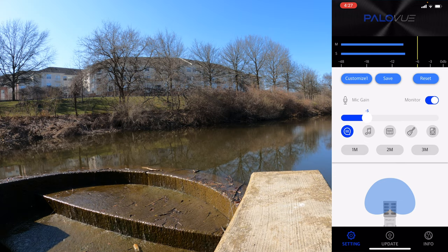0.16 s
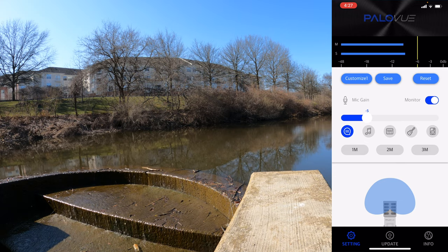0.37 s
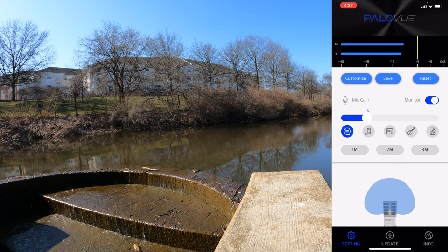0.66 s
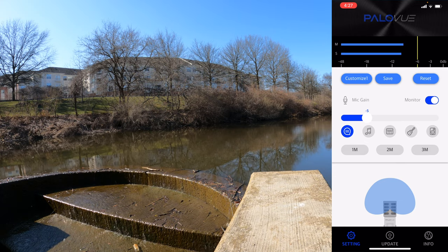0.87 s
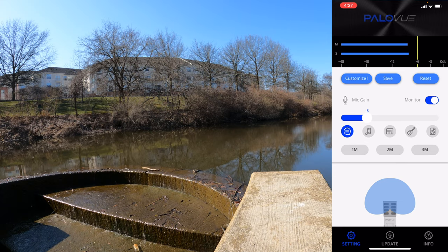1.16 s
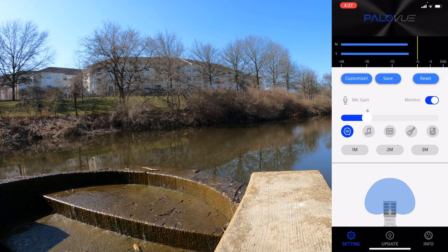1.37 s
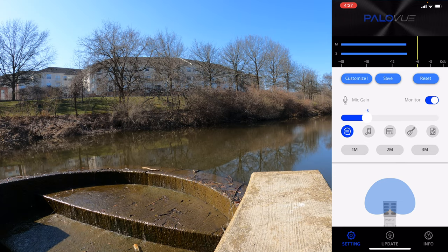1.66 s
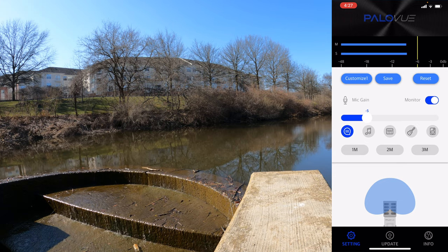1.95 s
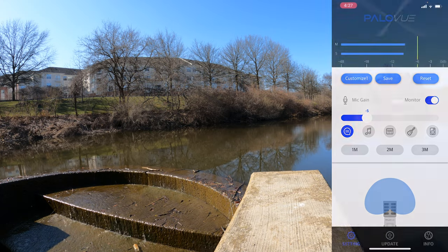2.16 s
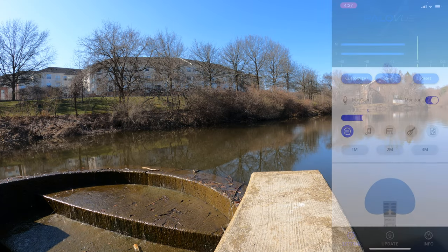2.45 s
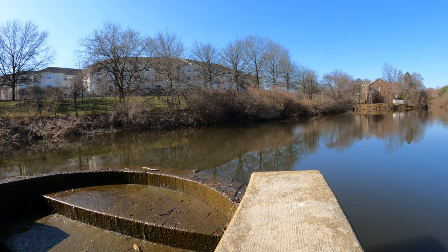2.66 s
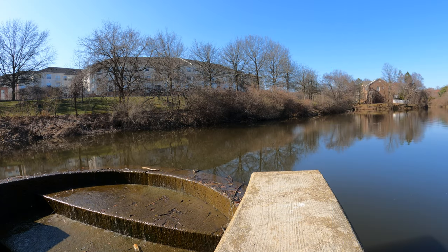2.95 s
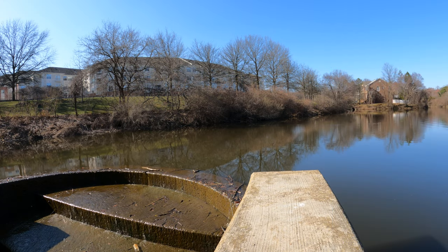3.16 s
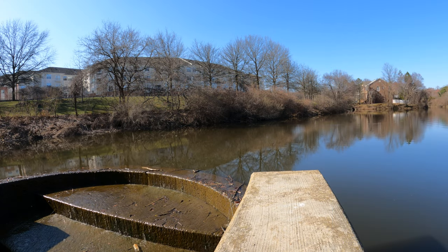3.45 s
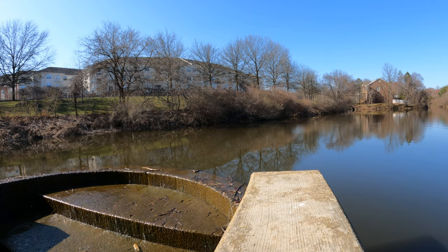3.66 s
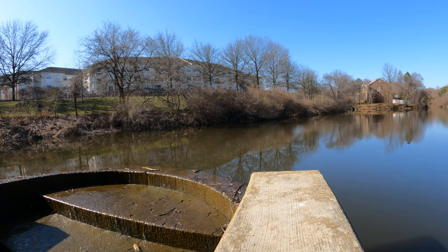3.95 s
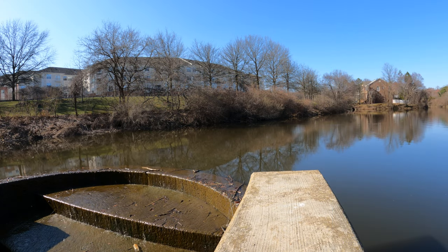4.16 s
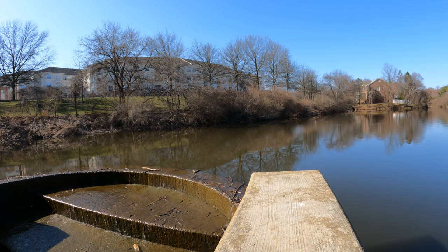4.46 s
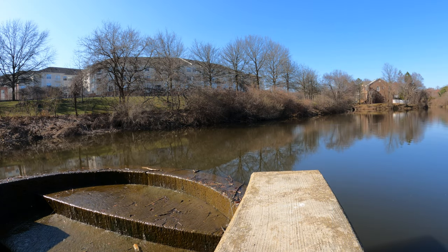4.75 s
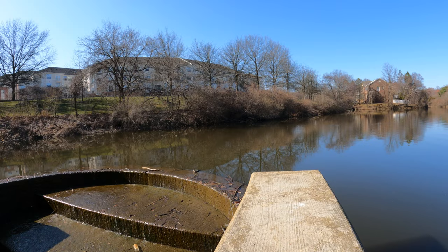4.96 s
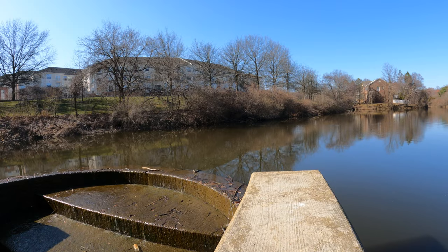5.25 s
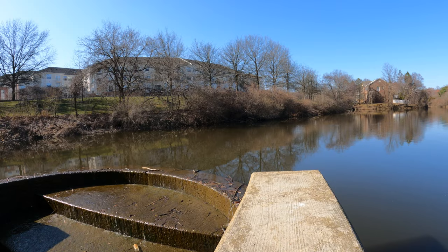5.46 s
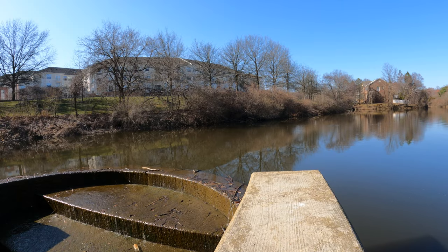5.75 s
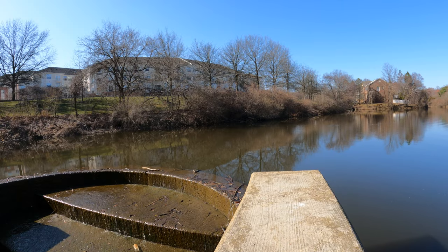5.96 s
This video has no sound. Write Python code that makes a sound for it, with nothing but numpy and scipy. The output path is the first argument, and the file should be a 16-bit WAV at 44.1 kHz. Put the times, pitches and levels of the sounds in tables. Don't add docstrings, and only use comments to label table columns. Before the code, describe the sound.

Water spills steadily over a small concrete weir with a soft bubbling hiss and scattered drips, while low wind gusts thump the microphone.

```python
import sys
import numpy as np
from scipy import signal
from scipy.fft import rfft, irfft, next_fast_len
from scipy.io import wavfile
from scipy.ndimage import uniform_filter1d, map_coordinates

SR = 44100
rng = np.random.default_rng(int(sys.argv[2]) if len(sys.argv) > 2 else 0)


def volts_from_decibels(level):
    exponent = np.asarray(level, float) / 20
    return 10 ** exponent


def persist_wave(psi):
    counts = np.round(np.clip(psi, -1, 1) * 32767).astype(np.int16)
    wavfile.write(sys.argv[1], SR, np.atleast_2d(counts).T)


N = 269010

# start_s, strength_db, fineness_db
GUSTS = [(0, -62, 1.5), (.45, -54.5, 0), (.65, -58, 1), (1.15, -58.5, 0), (1.75, -61.5, 1), (2.0, -54, -1),
         (2.3, -37, -0.5), (2.68, -43.5, -1), (2.84, -49.5, 1.5), (3.3, -43.5, 2), (3.5, -46, -1.5),
         (3.7, -43.5, 3), (4.25, -44.5, 2.5), (4.62, -37.5, 4), (4.85, -45, -2.5), (5.3, -46.5, -2),
         (5.75, -36.5, 1), (6.05, -43.5, -6.5)]
# centre_s, swell_db, half_length_s
SHOVES = [(0.43, 2.5, 0.026), (0.51, -8, 0.042), (0.833, 4.5, 0.053), (1.185, 5, 0.016), (1.847, -9, 0.072),
          (2.05, -3, .025), (2.287, -4, 0.021), (2.462, 1, 0.014), (2.504, -10, 0.029), (2.82, -6, 0.058),
          (3.187, 4, 0.043), (3.445, -9, 0.02), (3.926, 1, .03), (4.02, 3.5, 0.055), (4.926, 3, 0.071),
          (4.28, -2.5, 0.085), (4.427, 4, .04), (4.574, 7.5, 0.036), (4.694, 6, 0.065), (4.792, -6, 0.019),
          (5.152, -8, 0.025), (5.69, -6, 0.026), (5.818, -2, 0.024), (5.946, 4, 0.034)]
SHOVE_SHARES = [1.24, 0.25, .1]
# centre_s, peak_db, half_length_s
PUSHES = [
    (2.625, -20.5, 0.01),
    (3.731, -15, 0.0092),
    (4.06, -21, .012),
    (5.75, -15.5, 0.0068),
    (6.103, -23.5, .007),
]
# centre_s, peak_db, half_length_s
SUCKS = [
    (2.145, -16.5, 0.0094),
    (3.821, -24, 0.007),
    (5.21, -21, .011),
    (5.355, -18, 0.011),
    (5.455, -20.5, .011),
    (5.635, -24, 0.013),
    (5.768, -18, 0.0064),
]
# frequency_hz, density_db (per Hz)
HEAVE_COLOUR = [(3, 2.5), (10, 2.5), (22, 2), (35, -0.5), (55, -27.5), (90, -52), (200, -120)]
# frequency_hz, density_db (per Hz)
BUFFET_COLOUR = [(20, -120), (35, -7.5), (50, 0), (75, -7.5), (100, -15), (150, -36.5), (300, -120)]
# frequency_hz, density_db (per Hz)
FLUTTER_COLOUR = [(50, -120), (80, -4), (100, -4.5), (150, -8), (200, -13.5), (300, -38.5), (500, -120)]
# frequency_hz, density_db (per Hz)
DRONE_COLOUR = [(100, -120), (150, -16), (215, -4.5), (250, -1.5), (290, -11.5), (350, -18), (600, -120)]
# peak_s, peak_db, pitch_hz
TICKS = [(0.063, -49, 10100), (0.2242, -42, 6060), (0.2421, -45, 9450.0), (0.2425, -40, 6800),
         (0.558, -40, 6380.0), (0.707, -38, 5800), (0.7086, -42, 10710.0), (0.7741, -43, 6310.0),
         (0.9902, -43, 9490.0), (0.999, -46, 13150.0), (1.34, -44.5, 10290.0), (1.666, -42, 6840),
         (2.235, -43, 9930.0), (2.3692, -33.5, 6450), (2.3706, -47, 9990.0), (2.4683, -47, 9800.0),
         (2.5324, -37.5, 6770.0), (3.1381, -41, 9720.0), (3.8419, -53, 9310.0), (3.842, -36.5, 8400),
         (4.6023, -42, 9320.0), (4.6015, -43, 6500.0), (4.6352, -42, 6220), (5.1606, -38, 11300),
         (5.1868, -63, 9460.0), (5.4394, -41, 6300), (5.4968, -40, 5800), (5.7358, -54, 10050.0),
         (5.831, -40.5, 5760.0), (5.8569, -43, 10730.0)]
# peak_s, peak_db, pitch_hz
PLOPS = [(0.162, -38, 3800), (0.1904, -50, 4060), (0.2426, -34.5, 5200), (0.377, -43, 2850),
         (0.4507, -49, 930), (0.5863, -47, 554), (0.598, -42, 1820), (0.7645, -38, 1970),
         (0.8309, -37, 3880), (0.997, -41, 2350), (0.9966, -41, 4540), (1.1672, -40, 4660),
         (1.728, -48, 1430), (2.3985, -43, 2310), (2.5065, -46, 1480), (2.6421, -43, 1850),
         (2.7466, -44, 1090), (2.879, -48, 890), (3.227, -39.5, 2840), (3.378, -37.5, 2500),
         (3.732, -43.5, 1490), (4.318, -43, 1100), (4.5363, -46, 2110), (4.6158, -41, 4770),
         (4.798, -38, 4020), (4.9334, -42, 1930), (4.9335, -42, 2760), (4.9634, -44, 1490),
         (5.0058, -48, 1020), (5.7915, -42, 2260)]
# frequency_hz, density_db (per Hz)
SHEET_COLOUR = [(150, -19.5), (400, -5.5), (550, -2.5), (700, -2.5), (1200, -0.5), (3000, -3.5), (5000, -2),
                (6500, -2.5), (8000, -10.5), (10500, -10.5), (13000, -18.5), (14300, -18.5), (15700, -27),
                (16500, -120)]
# time_s, flow_db
FLOW = [
    (0, 0),
    (1, 0),
    (4.8, 0),
    (5, .7),
    (5.2, -.5),
    (6.1, 0.5),
]
# frequency_hz, share (0-1)
SURVIVING_SHARE = [(230, 1), (380, 0.82), (1100, 1), (2500, 0.86), (5000, 0.9), (8500, 0.83), (12000, 0.35)]


def unit(x):
    return x / np.sqrt(np.mean(x ** 2) + 1e-20)


def curves(rows):
    s, *columns = np.transpose(rows)
    return [np.interp(np.arange(N) / SR, s, column) for column in columns]


def wobble(rate_hz):
    knots = rng.standard_normal(int(N * rate_hz / SR) + 4)
    return map_coordinates(knots, [np.arange(N) * rate_hz / SR])


def filtered(x, response):
    size = next_fast_len(N + 8192)
    return irfft(rfft(x, size) * response(np.fft.rfftfreq(size, 1 / SR)), size)[:N]


def coloured(x, spectrum):
    f, db = np.transpose(spectrum)
    return unit(filtered(x, lambda hz: volts_from_decibels(np.interp(np.log(hz + 1), np.log(f + 1), db))))


def steadied(x, seconds, share):
    power = uniform_filter1d(x ** 2, max(int(seconds * SR), 1))
    return unit(x / (np.abs(power) + 0.036) ** (share / 2))


def patchy(depth_db, bins, frames):
    z = signal.stft(rng.standard_normal(N), nperseg=256)[2]
    field = uniform_filter1d(rng.standard_normal(z.shape), size=bins, axis=0)
    field = uniform_filter1d(field, size=frames, axis=1)
    return signal.istft(z * volts_from_decibels(depth_db * unit(field)), nperseg=256)[1][:N]


def bubbles(s, db, hz, cycles, rise, size):
    turns = hz[:, None] * np.arange(size) / SR
    life = turns / cycles
    ring = np.sin(2 * np.pi * turns * (1 + rise * life))
    ring *= np.exp(-life) * (1 - np.exp(-4 * life))
    ring *= volts_from_decibels(db)[:, None] * np.cos(np.pi / 2 * np.arange(size) / size) ** 2
    where = np.round(s * SR).astype(int)[:, None] + np.arange(size)
    return np.bincount(where.ravel(), ring.ravel(), N + size)[:N]


def swarm(count, centre_hz, octaves, scatter_db, cycles, rise, size):
    draw = rng.random((count, 2))
    hz = np.clip(centre_hz * 2 ** (octaves * rng.standard_normal(count)), 200, 14000)
    rarity = np.minimum(-np.log(1 - draw[:, 1]), 6.5)
    return unit(bubbles(draw[:, 0] * (N - 1) / SR, scatter_db * rarity, hz, cycles, rise, size))


def shoves():
    t = np.arange(0, N / SR + .002, .002)
    swell_db = sum(db * np.exp(-((t - s) / half) ** 2) for s, db, half in SHOVES)
    shove_db, = curves(np.transpose([t, swell_db]))
    return np.outer(SHOVE_SHARES, shove_db)


def wind_and_drone():
    strength_db, fine_db = curves(GUSTS)
    gust_db = strength_db - strength_db.mean()
    heave_db, buffet_db, flutter_db = shoves()
    levels_db = np.array([
        -35 + 0.36 * gust_db - 0.52 * fine_db + heave_db,
        -47 + 1.09 * gust_db + buffet_db,
        -57.5 + 0.38 * gust_db + 1.14 * fine_db + flutter_db,
        -64.5 + 1.8 * wobble(5)])
    colours = (HEAVE_COLOUR, BUFFET_COLOUR, FLUTTER_COLOUR, DRONE_COLOUR)
    layers = [steadied(coloured(rng.standard_normal(N), c), seconds=0.077, share=0.4) for c in colours]
    lumps_db = 1.6 * wobble(16)
    return np.sum(volts_from_decibels(levels_db + lumps_db) * layers, axis=0)


def thumps(rows):
    rebound = 0.63
    out = np.zeros(N + SR)
    reach = np.arange(-SR // 10, SR // 10)
    for s, db, half_s in rows:
        u = (reach / SR / half_s) ** 2
        out[round(s * SR) + reach] += volts_from_decibels(db) * (np.exp(-u) - rebound / 2 * np.exp(-u / 4))
    return out[:N]


def spray_ticks():
    s, db, hz = np.transpose(TICKS)
    ring = bubbles(s - 2.1 / hz, db + 9.5, hz, cycles=1.65, rise=0.011, size=120)
    snap_hz = 13500
    snap = bubbles(s - 1 / snap_hz, db + 1, np.full(len(s), snap_hz), cycles=.9, rise=0.01, size=40)
    return ring + snap


def pool_plops():
    s, db, hz = np.transpose(PLOPS)
    return bubbles(s - 2.25 / hz, db + 8.0, hz, cycles=2.3, rise=0.0091, size=700)


def weir():
    flow_db, = curves(FLOW)
    surge = 1.4 * wobble(20) + 0.23 * wobble(50)
    hiss = coloured(patchy(1.18, bins=4, frames=6), SHEET_COLOUR)
    gurgle = swarm(6000, centre_hz=1883, octaves=0.608, scatter_db=2.1, cycles=3.17, rise=0.086, size=500)
    fizz = swarm(16000, centre_hz=4390, octaves=0.624, scatter_db=2.5, cycles=2.58, rise=0.074, size=160)
    crackle = swarm(6000, centre_hz=9000, octaves=0.49, scatter_db=4.5, cycles=1.7, rise=0.02, size=60)

    def below(hz):
        return 1 / np.sqrt(1 + (hz / 3000) ** 6)

    def above(hz):
        return np.sqrt(1 - below(hz) ** 2)

    body = unit(filtered(hiss + volts_from_decibels(-8) * gurgle + volts_from_decibels(-11.5) * fizz, below))
    spray = unit(filtered(hiss + volts_from_decibels(-2.5) * fizz + volts_from_decibels(-16.5) * crackle, above))
    body_db = -53.5 + flow_db + 0.11 * surge
    spray_db = -54 + 0.8 * flow_db + 0.75 * surge
    return volts_from_decibels(body_db) * body + volts_from_decibels(spray_db) * spray


def scene():
    air = wind_and_drone() + thumps(PUSHES) - thumps(SUCKS)
    water = spray_ticks() + pool_plops() + weir()
    return np.tile(air + water, (2, 1))


def coarse(x, starved):
    hz, t, z = signal.stft(x, SR, nperseg=1536)
    f, share = np.transpose(SURVIVING_SHARE)
    kept = np.clip(np.interp(np.log(hz + 1), np.log(f), share), 0, 1)[:, None]
    edge = np.abs(np.diff(x, n=2))
    clicks_s = np.flatnonzero(edge > 6.5 * np.sqrt(np.mean(edge ** 2))) / SR
    sharp = np.any(np.abs(t[:, None] - clicks_s) < .014, axis=1)
    kept = np.where(sharp, 1, kept)
    power = np.abs(z) ** 2
    near = uniform_filter1d(power, size=4, axis=0)
    band = uniform_filter1d(power, size=26, axis=0)
    error = rng.standard_normal(z.shape) + 1j * rng.standard_normal(z.shape)
    z = np.sqrt(kept) * z + np.sqrt((1 - kept) * np.abs(near)) * error
    weak_db = np.interp(hz, [800, 1000, 6000, 12000], [-90, -24, -17, -14])[:, None]
    z[(near < band * volts_from_decibels(weak_db)) & ~sharp] = 0
    for start_s, stop_s, low_hz in starved:
        slab = (hz > low_hz) & (hz < low_hz + 2600)
        z[np.ix_(slab, (t > start_s) & (t < stop_s))] = 0
    return signal.istft(z, SR, nperseg=1536)[1][:N]


def starved_spells():
    flickers = [(s, s + .04, 12700) for s in rng.random(26) * N / SR]
    spells = []
    for place, length, edge in rng.random((14, 3)):
        start_s = place * N / SR
        stop_s = start_s + np.interp(length, [0, 1], [.02, .11])
        spells.append((start_s, stop_s, np.interp(edge, [0, 1], [7800, 11200])))
    return spells + flickers


def low_pass(x):
    return signal.sosfilt(signal.butter(12, 15730, fs=SR, output="sos"), x)


def record(dry):
    lag_s = 1 / 750
    late = filtered(dry[0], lambda hz: np.exp(-2j * np.pi * hz * lag_s))
    mid = coarse((late + dry[1]) / 2, [])
    side = coarse((late - dry[1]) / 2, starved_spells())
    return low_pass(np.array([mid + side, mid - side]))


dry = scene()
out = record(dry)
persist_wave(out)
```